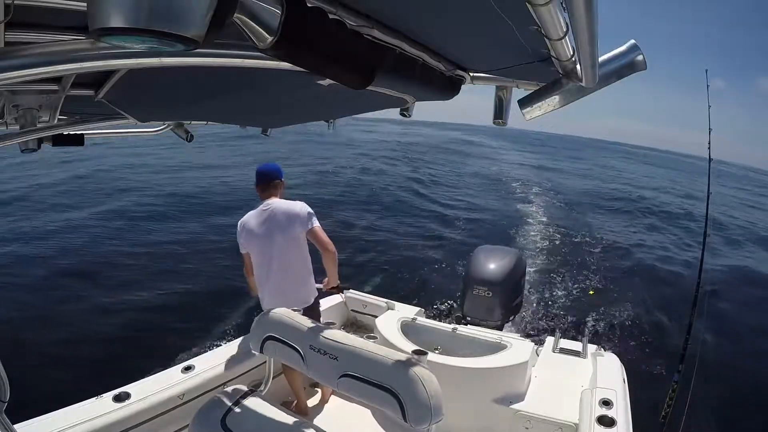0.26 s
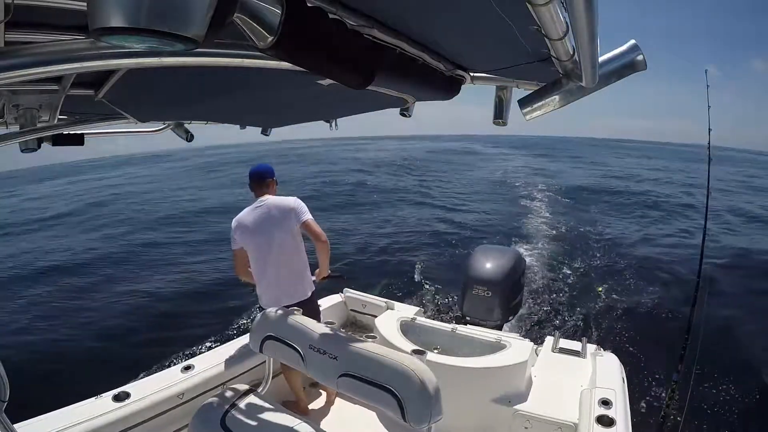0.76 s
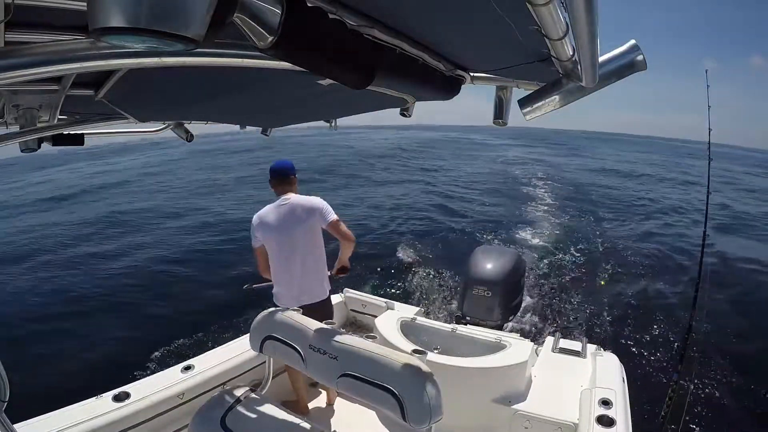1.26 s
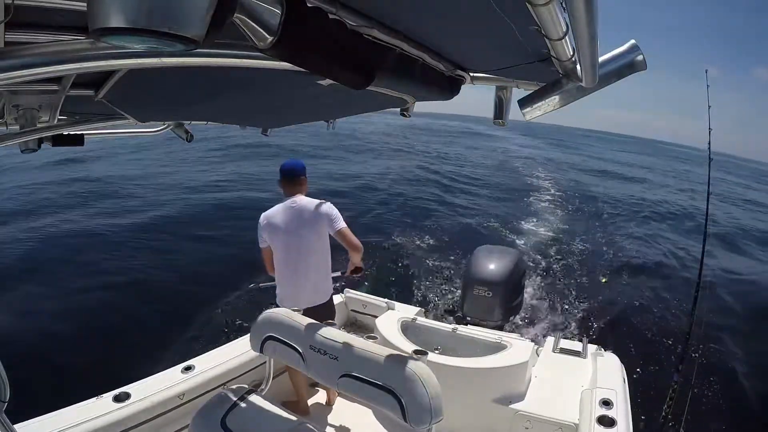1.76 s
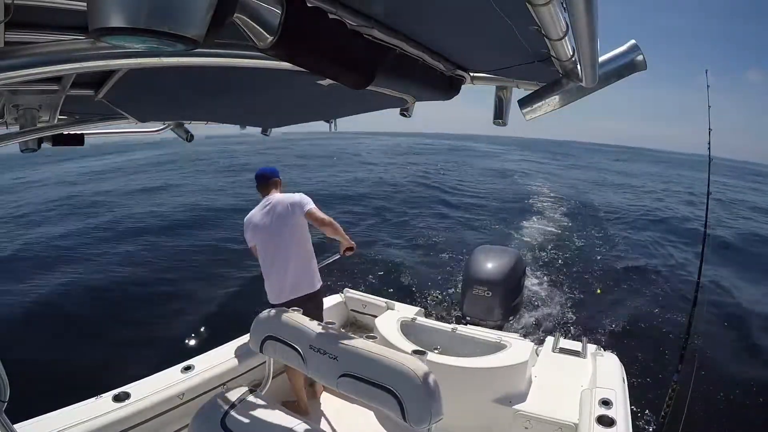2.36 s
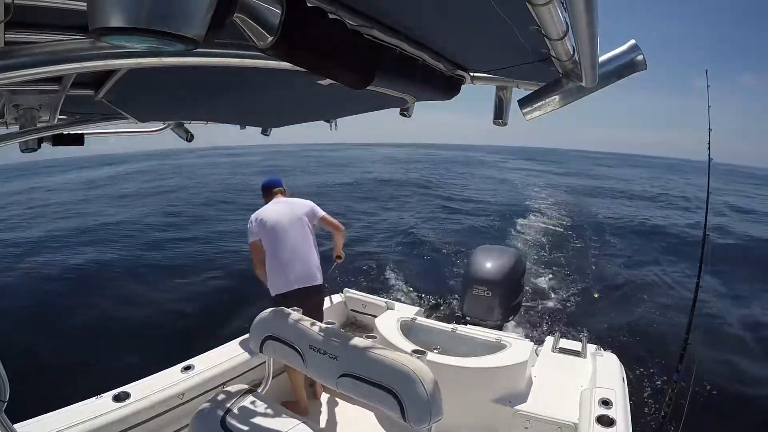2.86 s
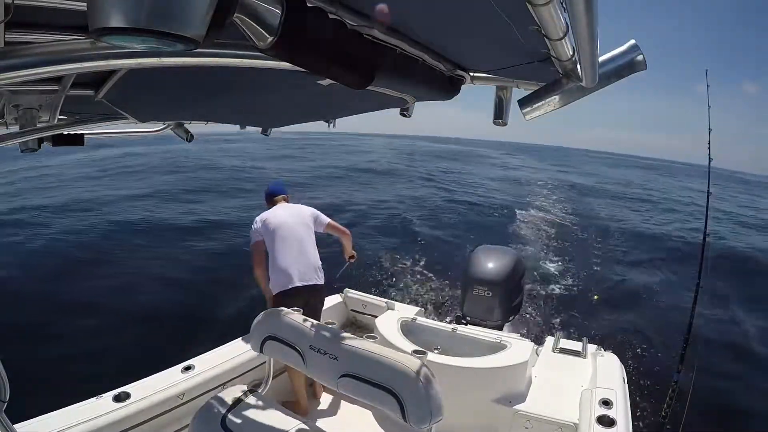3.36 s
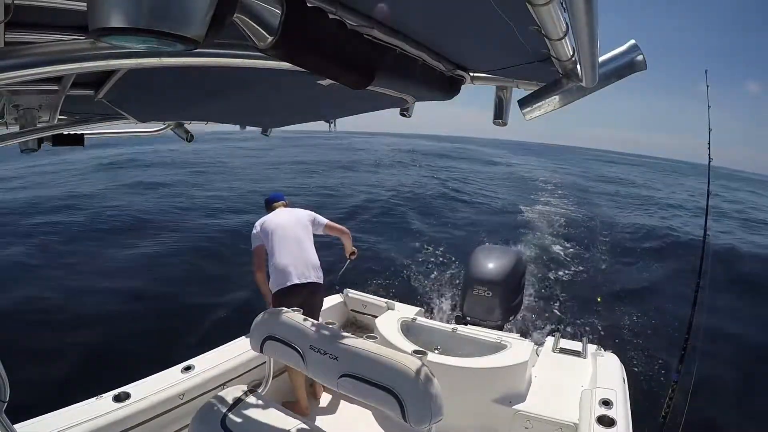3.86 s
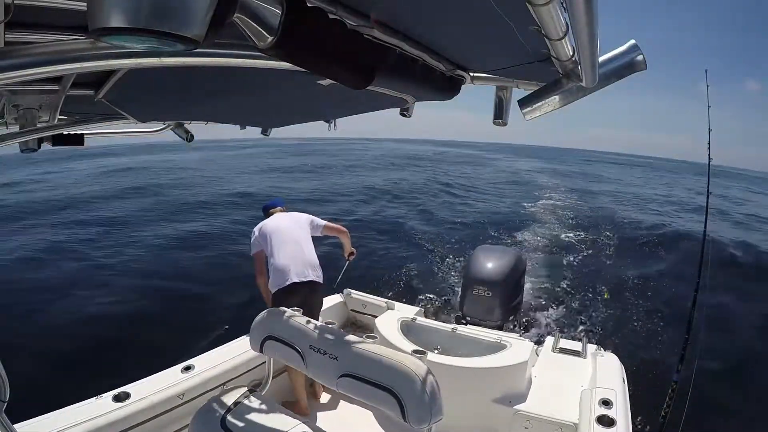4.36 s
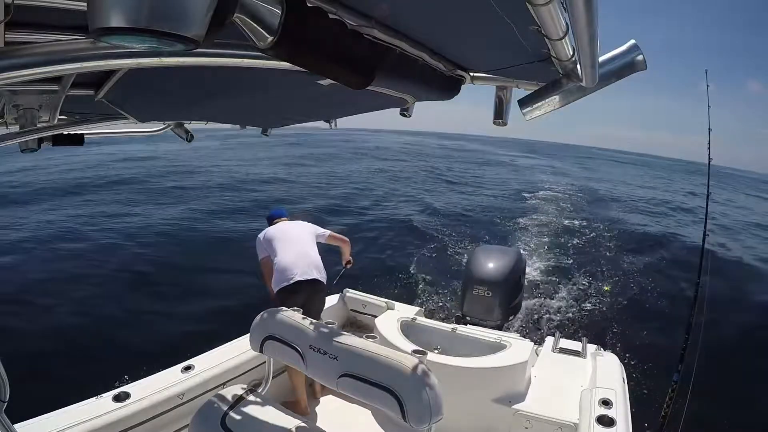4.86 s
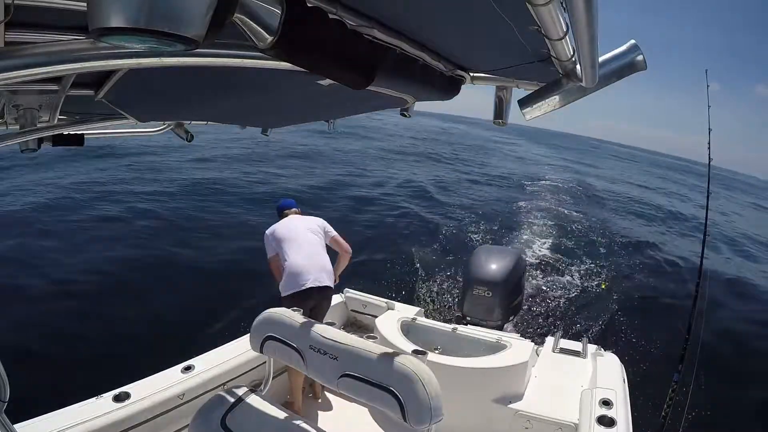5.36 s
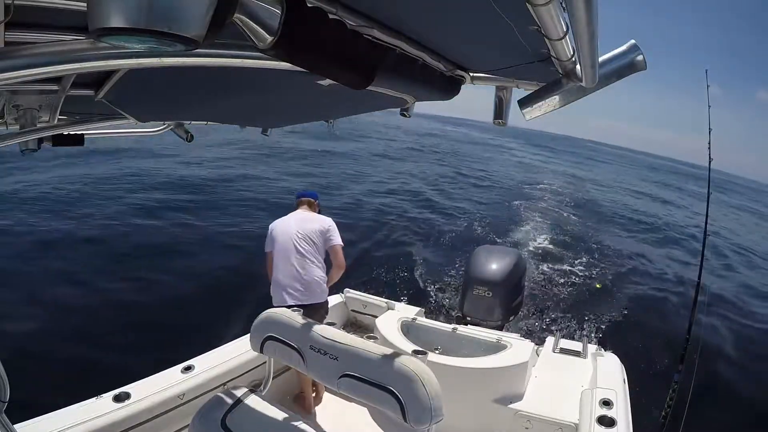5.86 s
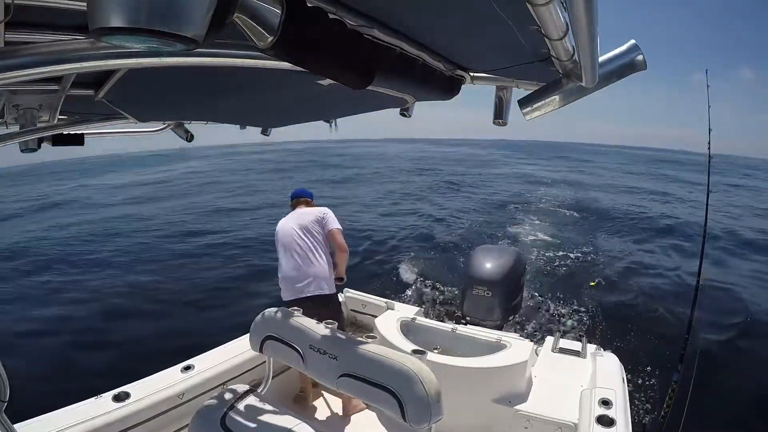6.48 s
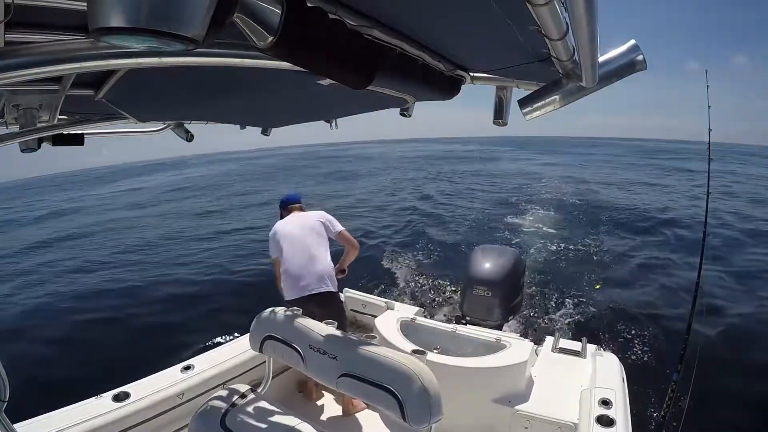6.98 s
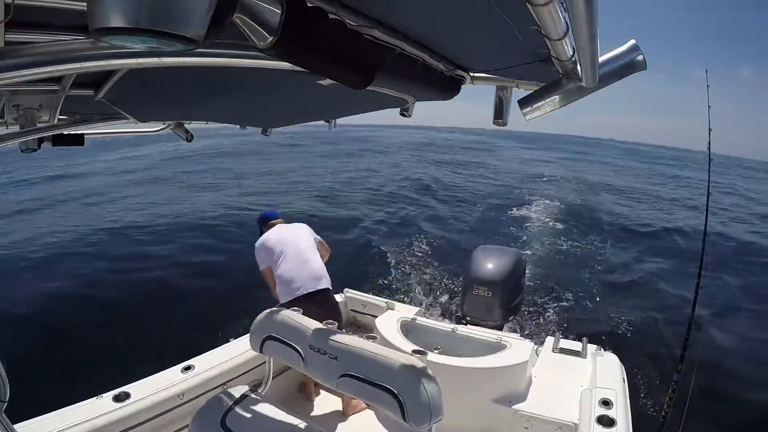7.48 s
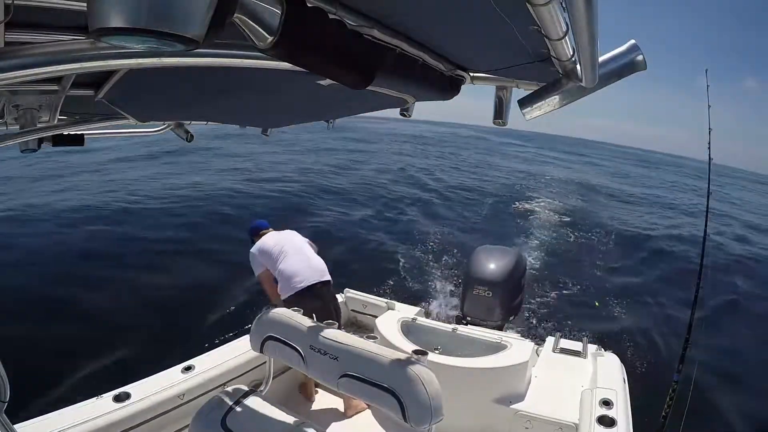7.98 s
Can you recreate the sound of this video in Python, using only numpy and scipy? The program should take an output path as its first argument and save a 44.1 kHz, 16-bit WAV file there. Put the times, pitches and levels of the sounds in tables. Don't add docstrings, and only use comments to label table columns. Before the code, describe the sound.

A boat's outboard idles with a soft low throb and drone on open water. Waves slap irregularly, knocking hollowly through the frame tubes; the hardest come early, midway and near the end. Between them bubbles gurgle, water sloshes and the wake hisses. Drops tick on the casing of a camera clamped to the canopy frame, so the motor and knocks sound boxy and vibration-borne, with a very faint high buzz.

```python
import sys
import numpy as np
from scipy import signal
from scipy.fft import rfft, irfft, next_fast_len
from scipy.io import wavfile
from scipy.ndimage import uniform_filter1d

SR = 44100
rng = np.random.default_rng(int(sys.argv[2]) if len(sys.argv) > 2 else 0)


def magnitude_from_level(level_db):
    exponent = np.asarray(level_db, float) / 20
    return 10 ** exponent


def unload_wav(signal):
    wavfile.write(
        sys.argv[1],
        SR,
        np.round(np.clip(np.atleast_2d(signal).T, -1, 1) * 32767).astype(np.int16),
    )


N = 362943

# frequency in Hz, level in dB, 60 dB decay in seconds.
FRAME_MODES = [(74.7, -14, 0.87), (213.7, 2.5, 0.25), (232, -0.5, 0.19), (260.4, -5.5, 0.27),
               (294, -11.5, 0.22), (326, -17, 0.13), (476.8, -9.5, 0.2), (501.4, -1, 0.15),
               (558, -22, 0.14), (645, -3.5, 0.16), (743, -0.5, 0.12), (801, -17.5, 0.28), (951, -6, 0.11),
               (1001.5, -5, 0.069), (1120, -3.5, 0.067), (1240, -3.5, 0.041), (1341, -6.5, 0.075),
               (1433, -11, 0.087), (1768, 1.5, 0.047), (1860, -3, 0.071), (1983, 3, 0.039),
               (2146, -1, 0.027), (2260, 3.5, 0.048), (2350, 5.5, 0.021), (2554, -1, 0.049),
               (2620, -35, 0.053), (3337, -14.5, 0.041), (3710, -22, 0.056)]
# frequency in Hz, density in dB per Hz.
SLOSH_SPECTRUM = [(26, -31), (45, 0), (62, -9), (134, -19.5), (157, -19), (188, -16.5), (220, -14),
                  (315, -21.5), (369, -30), (483, -27), (588, -33), (968, -32), (1570, -38), (2280, -39),
                  (3200, -51.5), (4160, -79), (7040, -120)]
# frequency in Hz, density in dB per Hz.
WASH_SPECTRUM = [(1590, -6), (2700, -6), (3160, -8), (3790, -1), (4510, -9.5), (6420, -13), (7740, -16.5),
                 (8570, -15), (9270, -18.5), (15200, -22)]
# frequency in Hz, density in dB per Hz.
SPRAY_SPECTRUM = [(1650, -46), (2800, -15), (3610, 2), (4220, -1.5), (5100, -4), (5670, -4.5), (6350, -5.5),
                  (8020, -9), (10700, -13.5), (15200, -31)]
# centre in Hz, width in Hz, lift in dB.
CASE_PEAKS = [(3440, 770, 1.5), (4930, 290, 5), (6370, 370, 5), (7100, 160, 2.5)]
# time in seconds, peak in dB, ring in Hz, crack in dB, splatter decay in seconds.
DROP_HITS = [(0.459, -42, 4180, -71, 0.0043), (1.565, -42, 3740, -64, 0.0071),
             (1.9868, -42, 3780, -68, 0.006), (2.211, -38.5, 4170, -69, 0.005),
             (2.2987, -50, 4100, -71, 0.0046), (2.461, -41, 4125, -72, 0.0041),
             (2.6125, -47, 4220, -67, 0.011), (3.1012, -46, 3530, -64, 0.006),
             (3.7349, -46, 6400, -48, 0.005), (4.5411, -46, 4200, -61, 0.006),
             (6.276, -41, 3880, -71, 0.005), (7.112, -39, 3820, -67, 0.014),
             (7.5572, -43.5, 4840, -73, 0.0066), (7.628, -50, 3600, -71, 0.006)]
# start in seconds, length in seconds, level in dB, swell in dB.
SPRAY_GUSTS = [(2.545, 0.037, -73, 0), (2.588, 0.091, -71.5, 1.5), (2.713, 0.015, -73, 2),
               (2.76, 0.012, -75, 0), (2.798, 0.02, -75, 0), (3.04, 0.015, -74.5, 0),
               (3.098, 0.018, -73.5, 1), (4.542, 0.16, -70.5, 5), (4.713, 0.24, -67.5, 3.5),
               (4.97, 0.03, -72, -2), (8.18, 0.074, -76, 2)]
# start in seconds, length in seconds, bubble level in dB, bubble pitch in Hz,
# slosh lift in dB.
WAVES_AFT = [(-0.2, 0.44, -51, 966, 5), (0.143, 0.36, -54, 958, 5.5), (0.46, 0.37, -46.5, 985, 4.5),
             (0.718, 0.4, -48, 962, 6.5), (1.494, 0.64, -69, 990, 7), (2.101, 0.59, -46, 998, 9),
             (3.001, 0.19, -49, 1055, 0), (3.569, 0.21, -50, 983, 5.5), (3.877, 0.47, -48.5, 1050, 3),
             (4.487, 0.21, -53.5, 1063, 3.5), (4.637, 0.38, -48, 1020, 6), (5.863, 0.48, -51, 1032, 6.5),
             (6.335, 0.14, -56, 1106, 0), (6.7, 0.88, -60, 1007, -0.5), (8.132, 0.35, -47, 1003, 7.5),
             (2.222, 0.12, -61, 910, 5.5), (6.26, 0.076, -44, 1210, 9.5), (6.711, 0.05, -51.5, 1146, -3),
             (7.052, 0.2, -56.5, 990, 5), (7.788, 0.054, -48, 950, -4), (4.213, 0.06, -56, 1200, 3),
             (1.145, 0.2, -59, 1010, 0.5), (4.754, 0.082, -49, 900, 4.5)]
# time in seconds, peak in dB, pitch in Hz.
AIR_POCKETS = [(0.245, -32.5, 930), (0.531, -41, 929), (2.215, -33, 1160), (2.288, -34, 926),
               (2.446, -40, 1040), (3.936, -37.5, 1213), (3.976, -42, 1030), (4.022, -38, 940),
               (4.167, -34, 957), (4.244, -44, 1350), (4.375, -40, 1140), (4.517, -39, 1140),
               (4.678, -42, 970), (4.931, -51, 977), (5.043, -39.5, 935), (5.856, -41.5, 1380),
               (5.974, -39, 1126), (6.355, -39.5, 1150), (6.425, -43.5, 1140), (6.605, -43.5, 1190),
               (6.95, -41, 964), (7.175, -44, 1156), (7.814, -34, 966), (7.992, -41, 1132)]
# time in seconds, peak in dB, pitch in Hz.
BIG_POCKETS = [(0.011, -36.5, 484), (0.209, -32, 520), (0.235, -27, 286), (0.504, -46, 460),
               (2.263, -27.5, 754), (2.275, -23.5, 293.5), (1.6, -40, 100), (2.235, -35, 132),
               (2.3, -25, 224), (2.32, -34, 635), (2.599, -33, 635), (2.713, -43, 508), (3.679, -30, 293),
               (6.165, -35.5, 487), (6.808, -45, 454), (6.995, -41, 523), (7.11, -40, 755),
               (8.195, -35, 340), (8.222, -29, 215)]
# time in seconds, peak in dB, pitch in Hz.
DROPLET_PINGS = [(0.0164, -40.5, 2310), (0.2164, -42, 2040), (0.2473, -41, 2270), (0.3217, -46, 2540),
                 (1.395, -43, 1750), (1.7933, -37, 2300), (2.1385, -40, 1800), (2.2054, -42, 2350),
                 (2.2578, -43, 2260), (2.2937, -36, 1860), (2.3144, -41, 2300), (2.4154, -42, 2320),
                 (2.598, -43, 2290), (3.5179, -51, 1780), (3.9414, -48, 2320), (4.129, -40, 1920),
                 (4.1444, -42, 2240), (4.1849, -42, 2010), (4.2433, -41, 2240), (4.2644, -43, 2080),
                 (4.35, -48, 2080), (4.3765, -45, 1790), (4.5161, -48, 1730), (4.5406, -38, 2370),
                 (4.6204, -40, 2250), (4.809, -43, 2500), (5.5283, -42, 2350), (6.0192, -43, 2540),
                 (6.0477, -46, 2050), (6.0694, -47, 2070), (6.7323, -42.5, 1800)]
# time in seconds, twice the firing rate in Hz.
MOTOR_RATE_HZ = [
    (0.0, 87.25),
    (0.78, 87.8),
    (1.17, 86.67),
    (2.63, 88.14),
    (2.7, 86.4),
    (5.22, 86.43),
    (5.66, 88.05),
    (8.23, 87.26),
]
# time in seconds, level in dB.
SHAKE_LEVEL_DB = [(0.0, -29), (0.32, -24.5), (0.52, -36.5), (0.9, -27), (1.3, -35.5), (1.74, -30),
                  (2.36, -21), (2.55, -26.5), (3.08, -31), (3.8, -30.5), (4.22, -38.5), (4.46, -31),
                  (5.45, -33.5), (5.73, -30), (6.3, -27), (6.85, -29.5), (7.15, -26.5), (8.23, -29.5)]
# time in seconds, level in dB.
FIRING_LEVEL_DB = [(0, -47.5), (1.05, -43), (1.55, -45.5), (1.801, -60), (2.29, -52), (2.75, -62.5),
                   (2.9, -52), (3.0, -41), (3.5, -47), (3.9, -55), (4.12, -44.5), (4.9, -43), (5.3, -49),
                   (6.1, -51), (6.4, -47), (7.0, -45.5), (7.6, -56.5), (8.23, -46.5)]
# time in seconds, level in dB.
DRONE_LEVEL_DB = [(0.0, -36), (0.52, -40.5), (1.0, -38), (1.3, -45.5), (1.74, -40.5), (2.11, -44),
                  (2.55, -49.5), (3.08, -47.5), (3.8, -35.5), (4.22, -44.5), (4.5, -38.5), (5.25, -44.5),
                  (5.9, -39), (6.4, -41.5), (6.92, -49), (7.1, -38.5), (7.6, -45), (8.23, -43.5)]
SHAKE_LINES_DB = [-5, 0.5, -0.5, -7]
DRONE_LINES_DB = [-2.5, 0.5, -6.5]
FIRING_LINES_DB = [-2.5, -18, -28, -22]
# time in seconds, half width in seconds, lift in dB.
THIRD_RESONANCE = (2.98, 0.16, 15.8)
# time in seconds, peak in dB, treble in dB, boom in dB.
FRAME_KNOCKS = [(0.074, -26.5, -44, -41), (0.19, -32.5, -56, -28.5), (0.258, -27, -52, -34),
                (0.628, -21, -41, -32), (0.915, -25.5, -54, -36), (1.532, -48, -61, -31),
                (1.606, -11.5, -24.5, -16.5), (1.656, -17, -33.5, -37), (1.71, -11, -25.5, -20.5),
                (1.856, -22.5, -38.5, -53), (1.953, -26, -39.5, -42), (2.216, -36, -57, -45),
                (2.558, -20, -41, -33.5), (2.661, -29.5, -58, -34), (3.329, -12, -28, -21),
                (3.409, -21.5, -40, -48), (3.462, -23, -44, -35), (3.617, -26.5, -47, -43),
                (3.673, -25.5, -49, -32.5), (4.635, -23, -43, -42), (4.754, -17, -42.5, -30),
                (5.406, -14, -32, -24.5), (5.507, -22.5, -47, -27.5), (6.567, -23, -48.5, -30.5),
                (7.629, -11.5, -25.5, -18.5), (7.686, -22, -40.5, -48), (7.744, -14, -32, -20),
                (7.792, -30, -49, -36), (7.856, -17.5, -40, -23), (7.949, -21.5, -42.5, -35)]
# time in seconds, peak in dB, treble in dB, boom in dB, strongest ring in Hz.
LOCAL_SPLASHES = [(0.472, -37, -73, -70, 754), (0.576, -33, -47, -37, 750), (0.678, -33, -65, -51, 1120),
                  (0.785, -29.5, -58, -44, 950), (0.959, -31.5, -48, -33, 785),
                  (1.76, -22, -36.5, -47, 755), (2.11, -20, -42, -38, 748), (2.241, -29.5, -47, -24, 785),
                  (2.379, -27.5, -64, -40, 930), (2.513, -34.5, -52, -38, 930), (3.126, -30, -35, -52, 770),
                  (4.124, -29.5, -51, -40, 1197), (4.197, -24.5, -56, -32, 987),
                  (5.292, -18, -35, -56, 784), (5.445, -31, -51, -27.5, 641), (5.942, -37, -67, -48, 1130),
                  (7.284, -33.5, -66, -53, 746), (7.36, -27.5, -39.5, -45, 766),
                  (7.463, -26, -39, -51, 748)]
# time in seconds, peak in dB.
LIGHT_LAPS = [(0.166, -28.5), (0.735, -34), (1.051, -31.5), (1.812, -32), (2.014, -25.5), (2.054, -28),
              (2.812, -41), (3.279, -37), (3.52, -37), (3.712, -30.5), (3.773, -30.5), (4.363, -36.5),
              (4.561, -34), (5.784, -32), (6.061, -33), (6.117, -29), (6.164, -32), (6.275, -33.5),
              (6.995, -44)]
# time in seconds, middle rings in dB, brace ring in dB,
# upper rings in dB, treble tilt in dB.
HULL_SPOTS = [(0.075, -2, -13.5, -7, -4), (0.167, -0.5, -13, -8, -1), (0.257, -2.5, -3.5, -8, 6.0),
              (0.626, -0.5, -16, -13.0, 1.5), (0.917, -5, -19, -16, -2.0), (0.961, 0, -8.5, -3, 0.5),
              (1.051, -2.0, -9.5, -6.5, 10), (1.608, -7.5, 0.5, 0.0, -2), (1.657, -0.0, -17, -6, -3.0),
              (1.712, 0.5, -15, -7.5, 1.5), (1.761, -1, -13, -4, 1), (1.814, -1, -14, -4.5, -3.5),
              (1.856, 3.5, -14, -6, -1.5), (1.952, 4, -14, -9.5, -1), (2.014, -4, -9, -9.5, 0),
              (2.053, -1, -15, -8.5, 5), (2.111, -4, -3, -8.5, -6), (2.56, -1, -8.5, -12, 4.5),
              (2.663, -1.5, -16.5, -9.5, -1.5), (3.127, 1, -3, 11.5, 1.5), (3.33, -5, -12.0, -9.5, -1),
              (3.41, 1, -16, -6, -2.0), (3.464, -0.5, -10, -14, -1.0), (3.616, -2, -11, -5.0, 2),
              (3.672, -1.5, -11.5, -12.5, 0.5), (3.775, -15, -16.5, -13.5, -7), (4.634, 1.5, -7, -13.5, -1),
              (4.756, -2, -16, -11, 3), (5.293, 2.5, -12.5, 2.5, 5), (5.408, -4.5, -9.5, -10.5, -5.5),
              (5.506, -3.0, -11.5, -8, -2.5), (6.118, -5, -1, -7.5, 5), (6.568, -0.5, -15, -17.5, -5.5),
              (7.36, 10.5, -4, 9.5, 4), (7.465, 7, -5.5, 8, 0), (7.63, -12.5, -10, -9.5, -4.5),
              (7.685, 2, -8, -6.0, 1), (7.745, -4.5, -4, -4.5, -2), (7.857, -7.5, -9, -10, -6.5),
              (7.951, -3.5, -6, -6.5, -5.0)]


def unit(x):
    return x / np.sqrt(np.mean(x ** 2))


def curve(table):
    time_s, value = np.transpose(table)
    return np.interp(np.arange(N) / SR, time_s, value)


def walk(rate_hz):
    k = int(SR / rate_hz)
    held = np.repeat(rng.standard_normal(N // k + 1), k)
    return 1.27 * uniform_filter1d(uniform_filter1d(held, k), k)[:N]


def colour(x, spectrum, peaks=()):
    size = next_fast_len(N)
    hz = np.arange(1, size // 2 + 2) * SR / size
    point_hz, point_db = np.transpose(spectrum)
    db = np.interp(np.log(hz), np.log(point_hz), point_db, left=-120, right=-120)
    for centre_hz, width_hz, lift_db in peaks:
        db = db + lift_db / (1 + (2 * (hz - centre_hz) / width_hz) ** 2)
    return unit(irfft(rfft(x, size) * magnitude_from_level(db), size)[:N])


def grains(per_s, scatter_db, tail_s):
    sizes = magnitude_from_level(scatter_db * np.minimum(rng.exponential(size=N), 4))
    hits = (rng.random(N) < per_s / SR) * sizes
    power = signal.lfilter([1], [1, -np.exp(-1 / (tail_s * SR))], hits ** 2)
    return unit(rng.standard_normal(N) * np.sqrt(power))


def chirp():
    field_hz, tone_hz = 60 / 1.001, 8540
    fields = np.arange(N) / SR * field_hz
    count, part = fields.astype(int), fields % 1
    onset = np.where(count % 2, .58, .45)
    gate = np.clip((part - onset) / 0.073, 0, 1) * np.clip((1 - part) / 0.066, 0, 1) * (.55 + .5 * part)
    slip = rng.standard_normal((count[-1] + 1, 2))[count]
    tone = np.sin(2 * np.pi * tone_hz * part / field_hz + .7 * slip[:, 0] + 0.39 * walk(200))
    return magnitude_from_level(-71.5 + 0.86 * slip[:, 1]) * unit(gate * tone)


def swell(t, start_s, length_s):
    rise_share = 0.29
    part = (t - start_s) / length_s
    return np.clip(np.minimum(part / rise_share, (1 - part) / (1 - rise_share)), 0, 1)


def water():
    t = np.arange(N) / SR
    lift_db = sum(db * np.minimum(1.53 * swell(t, start_s, length_s), 1)
                  for start_s, length_s, _, _, db in WAVES_AFT)
    modes = [(hz, 0.73 / t60_s + 40, 4.0) for hz, _, t60_s in FRAME_MODES[2:]]

    lapping = 0.71 * grains(per_s=200, scatter_db=4.0, tail_s=0.011) + 0.58 * rng.standard_normal(N)
    hull = colour(lapping, SLOSH_SPECTRUM, modes)
    low = signal.sosfiltfilt(signal.butter(3, 390, fs=SR, output="sos"), hull)
    surge = magnitude_from_level(0.68 * lift_db - 46.0 + 1.67 * walk(3.13)) * unit(low)

    trickle = 0.81 * grains(per_s=260, scatter_db=4.5, tail_s=0.01) + 0.45 * rng.standard_normal(N)
    trickle = colour(trickle, SLOSH_SPECTRUM, modes)
    split = signal.butter(3, 1550, fs=SR, output="sos")
    mid = signal.sosfiltfilt(split, hull - low)
    high = trickle - signal.sosfiltfilt(split, trickle)
    slosh = magnitude_from_level(lift_db - 54 + 3 * walk(20)) * unit(mid)
    slosh = slosh + magnitude_from_level(0.77 * lift_db - 62.5 + 1.5 * walk(9)) * unit(high)

    fizz = 0.47 * grains(per_s=730, scatter_db=4.0, tail_s=0.0015) + 0.77 * rng.standard_normal(N)
    wash = magnitude_from_level(0.17 * lift_db - 61.5 + 0.53 * walk(19)) * colour(fizz, WASH_SPECTRUM, CASE_PEAKS)
    return surge + slosh + wash


def gust(t, start_s, length_s, level_db, swell_db):
    attack_s, release_s = 0.0045, 0.031
    age_s = t - start_s
    gate = np.clip(np.minimum(age_s / attack_s, 1 - (age_s - length_s) / release_s), 0, 1)
    return gate * magnitude_from_level(level_db + swell_db * np.sin(np.pi * np.clip(age_s / length_s, 0, 1) ** 0.96))


def spray():
    t = np.arange(N) / SR
    level = sum(gust(t, *row) for row in SPRAY_GUSTS) * magnitude_from_level(1.1 * walk(20))
    excess = np.sqrt(np.maximum(level ** 2 - magnitude_from_level(2 * -78.5), 0))
    patter = .6 * grains(per_s=1500, scatter_db=4, tail_s=.0015) + .7 * rng.standard_normal(N)
    peaks = CASE_PEAKS + [(7000, 810, 3), (10800, 930, 6.4), (12780, 900, 5)]
    return excess * magnitude_from_level(12.5 + walk(60)) * colour(patter, SPRAY_SPECTRUM, peaks)


def drops():
    rings, splatter, t = np.zeros(N + SR), np.zeros(N + SR), np.arange(2000) / SR
    cracking = np.diff(rng.standard_normal((len(DROP_HITS), len(t) + 2)), 2) / 2.4
    for (s, peak_db, hz, crack_db, tail_s), noise in zip(DROP_HITS, cracking):
        span = slice(int(s * SR), int(s * SR) + len(t))
        ring = np.sin(2 * np.pi * hz * t) * np.exp(-t / 0.0022) * np.minimum(t / 0.00031, 1)
        rings[span] += magnitude_from_level(peak_db - 4) * ring
        rings[span] += magnitude_from_level(crack_db + 1.5) * noise * np.exp(-((t - .0015) / .0006) ** 2)
        splatter[span] += magnitude_from_level(peak_db - 10.5) * np.exp(-t / tail_s)
    hiss = colour(rng.standard_normal(N), SPRAY_SPECTRUM, CASE_PEAKS + [(11500, 7000, -12)])
    return rings[:N] + splatter[:N] * hiss


def gurgles():
    decay_cycles, spread_octaves = 4.75, 1.17
    edge_db = -13
    out = np.zeros(N + 2 * SR)
    chance = rng.random((len(WAVES_AFT), 400, 5))
    for (start_s, length_s, db, centre_hz, _), swarm in zip(WAVES_AFT, chance):
        for when, size, rise, pitch, skew in swarm:
            at_s = start_s + .77 * when
            if when * .77 > length_s or at_s < 0:
                continue
            hz = centre_hz * 2 ** (.58 * (pitch + skew - 1))
            turns = np.arange(int(40 / hz * SR)) * hz / SR
            phase = 2 * np.pi * turns * (1 + .004 * rise ** 2 * turns)
            decay = np.exp(-turns / (decay_cycles * 2 ** (spread_octaves * (1 - rise) ** 2)))
            ping = np.sin(phase) * decay * np.minimum(turns / 1.6, 1)
            fade_db = edge_db * (1 - swell(at_s, start_s, length_s))
            start = int(at_s * SR)
            out[start:start + len(turns)] += magnitude_from_level(db + fade_db + 16.5 * size - 8.5) * ping
    return out[:N]


def pockets():
    ring_s, waver_rad = .014, 0.9
    out, t, waver = np.zeros(N + SR), np.arange(5000) / SR, np.tile(walk(250), 2)
    for s, peak_db, hz in BIG_POCKETS + AIR_POCKETS + DROPLET_PINGS:
        span = slice(int(s * SR), int(s * SR) + len(t))
        phase = 2 * np.pi * hz * t * (1 + 0.2 * t) + waver_rad * hz / 2000 * waver[span]
        size = np.minimum(t / 0.0022, 1) * np.exp(-t / ring_s * (hz / 1000) ** 0.64)
        out[span] += magnitude_from_level(peak_db - 2.0) * size * np.sin(phase)
    return out[:N]


def lines(cycle, multiples, levels_db, wander_db, wander_rad, rate_hz):
    out = np.zeros(N)
    for k, db in zip(multiples, levels_db):
        phase = k * cycle + wander_rad * walk(rate_hz) + 2 * np.pi * rng.random()
        out += magnitude_from_level(db + wander_db * walk(rate_hz)) * np.sin(phase)
    return unit(out)


def motor():
    t = np.arange(N) / SR
    cycle = 2 * np.pi * np.cumsum(curve(MOTOR_RATE_HZ)) / (12 * SR)
    firing = lines(cycle, (12, 24, 9, 8), FIRING_LINES_DB, wander_db=2.5, wander_rad=0.71, rate_hz=5)
    third = lines(cycle, [18], [0], wander_db=3.0, wander_rad=0.61, rate_hz=8)
    shake = lines(cycle, (3, 4, 5, 6), SHAKE_LINES_DB, wander_db=3.0, wander_rad=1.36, rate_hz=4.9)
    drone = lines(cycle, (29, 30, 31), DRONE_LINES_DB, wander_db=2.5, wander_rad=0.38, rate_hz=11)
    swell_s, width_s, lift_db = THIRD_RESONANCE
    third_db = -63 + lift_db * np.exp(-((t - swell_s) / width_s) ** 2)
    fourth = magnitude_from_level(-48.5) * np.exp(-((t - 3.17) / 0.11) ** 2) * np.sin(24 * cycle)
    return (fourth + magnitude_from_level(third_db) * third
            + magnitude_from_level(curve(FIRING_LEVEL_DB) + 0.45) * firing
            + magnitude_from_level(curve(SHAKE_LEVEL_DB) + 0.43) * shake
            + magnitude_from_level(curve(DRONE_LEVEL_DB) + 1.46) * drone)


def blows():
    main_ring_hz = 508.5
    knocks = [(*row, main_ring_hz, 26.7) for row in FRAME_KNOCKS]
    splashes = [(*row, 35) for row in LOCAL_SPLASHES]
    laps = [(s, db, db - 19.5, db - 9.5, main_ring_hz, 31) for s, db in LIGHT_LAPS]
    return sorted(knocks + splashes + laps)


def cracks():
    size, t = np.zeros(N + SR), np.arange(4000) / SR
    for s, _, treble_db, *_ in blows():
        start = int((s - .0045) * SR)
        size[start:start + len(t)] += magnitude_from_level(treble_db - 7) * np.minimum(t / 0.0028, 1) ** 2 * np.exp(-t / 0.0075)
    spectrum = [(900, -21), (1500, 4.0), (2900, -5.5), (3900, -10.5), (4800, -36)]
    return size[:N] * colour(rng.standard_normal(N), spectrum)


def tubes(lag_s, boom_lag_s, rise_cycles, boom_cycles):
    hz, db, t60_s = (c[:, None] for c in np.transpose(FRAME_MODES))
    depth = np.minimum(200 / hz, 1.2) ** 4 * (hz > 100)
    arrival_s = lag_s * (500 / hz) ** 0.532 + boom_lag_s * depth
    t = np.maximum(np.arange(SR // 2) / SR - arrival_s, 0)
    build_cycles = rise_cycles * (hz / 500) ** 1.25 + boom_cycles * depth
    rise = 1 - np.exp(-(t * hz / build_cycles) ** 2)
    return magnitude_from_level(db) * rise * np.exp(-np.log(1000) * t / t60_s + 2j * np.pi * hz * t)


def spot(s, hz):
    table = np.array(HULL_SPOTS)
    row = table[np.argmin(np.abs(table[:, 0] - s))]
    middle_db, brace_db, upper_db, tilt_db = row[1:] - table[:, 1:].mean(axis=0)
    lift_db = 0.82 * middle_db * ((hz > 590) & (hz < 870))
    lift_db = lift_db + 0.9 * brace_db * ((hz > 870) & (hz < 990))
    lift_db = lift_db + 0.82 * upper_db * ((hz > 990) & (hz < 1600))
    lift_db = lift_db + 1.1 * tilt_db * ((hz > 2080) & (hz < 2440))
    return lift_db * (abs(row[0] - s) < .008)


def slaps():
    rings = tubes(lag_s=0.00188, boom_lag_s=0.01327, rise_cycles=0.72, boom_cycles=4.4)
    hz = np.array(FRAME_MODES)[:, 0]
    boom, middle, treble = hz < 400, (hz > 400) & (hz < 1600), hz > 1600
    hits = blows()
    out, chance = np.zeros(N + SR), rng.standard_normal((len(hits), 4, len(FRAME_MODES)))
    t, rattle = np.arange(rings.shape[1]) / SR, np.tile(walk(120), 2)
    for (s, peak_db, treble_db, boom_db, ring_hz, damping), draw in zip(hits, chance):
        favour_db = 4.96 * (ring_hz / 500) ** 1.5 / (1 + ((hz - ring_hz) / (0.055 * ring_hz)) ** 2)
        favour_db = favour_db + spot(s, hz)
        first = magnitude_from_level(1.53 * draw[0] * (hz > 100) + favour_db) * np.exp(.35j * draw[1])
        second = magnitude_from_level(3 * draw[2] * (hz > 100) - 9 + favour_db) * np.exp(2j * np.pi * draw[3])
        late = int((.009 + .003 * np.clip(draw[3, 0], -2, 2)) * SR)
        start = int((s - .0032) * SR)
        cling = np.exp(-damping * t)
        waver = np.exp(.9j * rattle[start:start + len(t)] * np.clip(t / .03, 0, 1))
        for part, db in ((boom, boom_db + 1.8), (middle, peak_db - .6), (treble, treble_db + 5.5)):
            ring = first[part] @ rings[part]
            ring[late:] += (second[part] @ rings[part])[:-late]
            if part is not boom:
                ring = ring * cling * waver
            out[start:start + len(ring)] += magnitude_from_level(db) * ring.imag / np.abs(ring).max()
    return out[:N]


def scene():
    background = chirp() + water() + spray() + drops()
    return (background + gurgles() + pockets() + motor() + cracks() + slaps())[None]


def roll_off(x):
    return signal.sosfilt(signal.butter(12, 15300, fs=SR, output="sos"), x)


def record(dry):
    mix = signal.sosfilt(signal.butter(2, 16, "high", fs=SR, output="sos"), dry)
    return roll_off(mix)


dry = scene()
out = record(dry)
unload_wav(out)
```